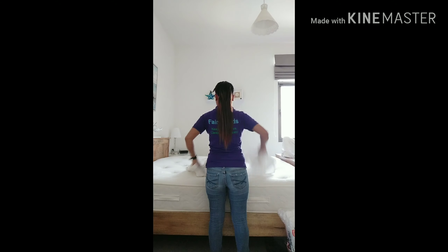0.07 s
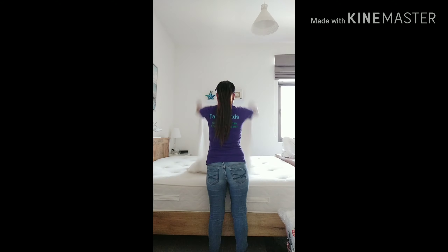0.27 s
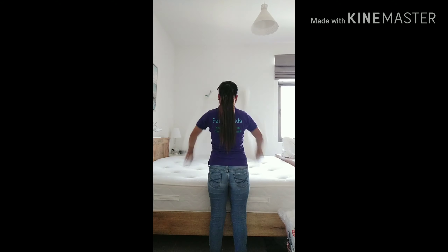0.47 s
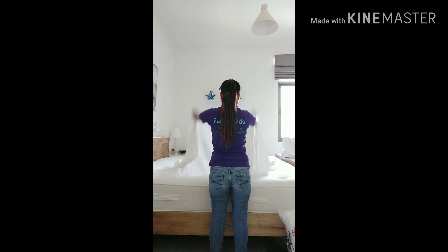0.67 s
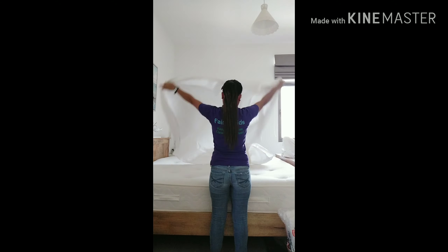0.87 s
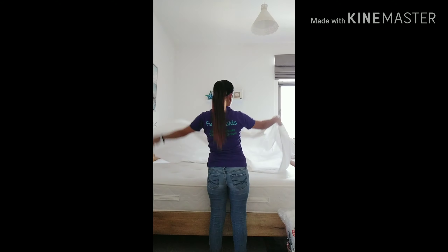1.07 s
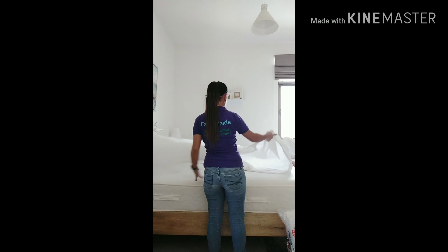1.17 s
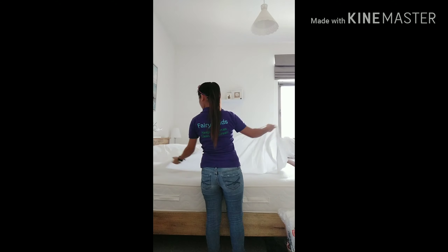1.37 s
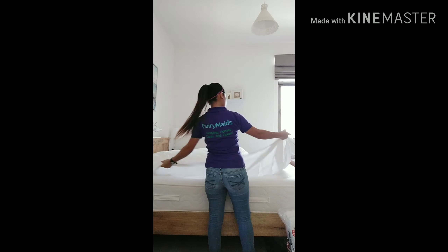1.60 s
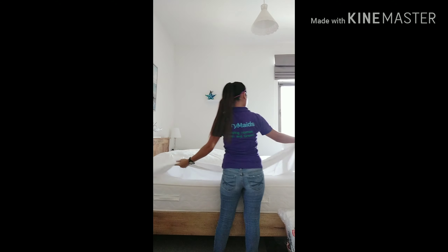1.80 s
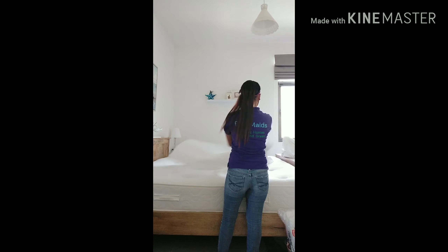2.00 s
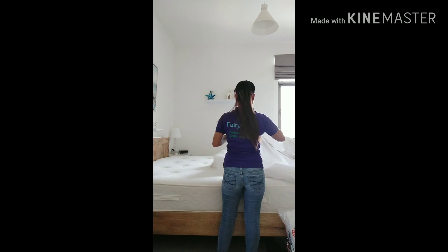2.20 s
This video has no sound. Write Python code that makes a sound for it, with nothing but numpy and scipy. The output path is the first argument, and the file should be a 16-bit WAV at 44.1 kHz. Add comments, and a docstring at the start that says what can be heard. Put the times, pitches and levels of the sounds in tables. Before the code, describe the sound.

A cotton sheet rustles lightly as it is gathered, swelling at about 0.2 seconds. It flaps near 0.4 seconds and again, more fully, around 0.6 to 0.7, with soft snaps, a swish and low puffs of air, settling by 0.9. The cloth then slides faintly over the bed with tiny scuffs, and rustles briefly again around 2.2 seconds. A faint room rumble lies underneath.

```python
"""Soft pops, a papery patter and a swish are heard first, over the faint rumble of a small bedroom:
a cotton sheet is gathered, shaken out twice and drawn over a bed. Ripples travel through the cloth
and pop at its edge, creases buckle, and friction between threads makes the weave hiss. Taut folds
snap, the billowing sheet pushes low puffs of air, and a faint hollow ring comes near the end.
Standing waves and reflections between the walls colour the sound of the cloth."""
import sys
import numpy as np
from scipy import signal
from scipy.fft import rfft, irfft
from scipy.io import wavfile
from scipy.ndimage import uniform_filter1d

SR = 44100
rng = np.random.default_rng(int(sys.argv[2]) if len(sys.argv) > 2 else 0)


def wav_record(signal):
    """Record a signal, one row per channel, as 16-bit PCM in the file named by sys.argv[1]."""
    frames = np.transpose(np.atleast_2d(signal))
    bounded = np.clip(frames, -1, 1)
    # unit amplitude maps onto the largest positive 16-bit level
    quanta = np.round(bounded * 32767).astype(np.int16)
    wavfile.write(sys.argv[1], SR, quanta)


N = 99225
T = np.arange(N) / SR
HZ = np.fft.rfftfreq(N, 1 / SR)

# Levels are relative within each table; a half-length is the standard deviation of a Gaussian swell.
# Cloth being shaken (time [s], flutter level [dB], crumple level [dB])
SHAKE_LEVELS = [(0, -66, -68.5), (.03, -64, -63), (.06, -79, -72.5), (.17, -75, -73), (.2, -62, -62.5),
                (.235, -50.5, -54.5), (.285, -53.5, -60), (.33, -86, -70.5), (.378, -47, -50.5),
                (.418, -44.5, -46), (.436, -37.5, -43.5), (.465, -42, -51.5), (.485, -69, -65.5),
                (.555, -65, -69.5), (.574, -40.5, -49.5), (.612, -36, -44), (.64, -32.5, -46),
                (.67, -48.5, -47.5), (.695, -39.5, -45.5), (.706, -54, -51), (.73, -44.5, -59),
                (.765, -51, -54), (.82, -50, -55), (.855, -48, -57), (.91, -78, -70), (1.0, -65, -71.5),
                (1.11, -63.5, -68), (1.24, -71, -83.5), (1.55, -68.5, -75.5), (1.66, -69.5, -80.5),
                (1.8, -67.5, -77), (1.93, -71, -80), (2.06, -74, -72.5), (2.14, -54.5, -61.5),
                (2.19, -58.5, -69), (2.215, -50.5, -73), (2.25, -73.5, -64.5)]
# Cloth sliding over cloth (time [s], level [dB])
SLIDE_LEVELS = [(0.0, -61.5), (0.03, -62), (0.06, -69.5), (0.18, -68), (0.23, -60), (0.27, -61),
                (0.32, -68), (0.34, -68), (0.37, -59), (0.44, -55), (0.51, -67.5), (0.55, -66), (0.6, -54),
                (0.7, -55.5), (0.74, -62.5), (0.75, -59.5), (0.85, -62.5), (0.96, -70), (1.15, -70.5),
                (1.25, -82), (1.48, -73.5), (1.55, -64.5), (1.6, -70.5), (1.63, -75.5), (1.87, -71.5),
                (1.92, -78), (2.06, -69), (2.15, -62), (2.25, -69.5)]
# Folds pulled taut (time [s], level [dB], time constant [ms])
TAUT_FOLDS = [(.191, -46, 1.1), (.290, -43, 1.1), (.378, -45, 0.34), (.432, -24, 0.65), (.441, -25.5, 0.54),
              (.571, -30.5, 0.33), (.607, -28.5, 0.36), (.631, -33, 0.51), (.646, -27, .6),
              (.679, -50, 0.27), (.690, -27.5, 0.73), (.757, -44, 0.16), (.797, -37.5, 1.5),
              (.818, -36.5, 0.18), (1.191, -42, 0.1), (1.271, -51, 0.16), (2.208, -49, .7)]
# Air pushed by the sheet (time [s], level [dB], half-length [s], pitch [Hz])
AIR_PUFFS = [(.445, -44, .017, 145), (.645, -38.5, .025, 122), (.74, -51, .025, 58), (.85, -53, .02, 125),
             (.22, -56, .025, 60)]
# Edge cutting the air (time [s], level [dB], half-length [s], centre [Hz], half-width [Hz])
EDGE_WHISH = (.39, -56, .018, 1850, 250)
# One fold rubbing across another (time [s], level [dB], half-length [s], tilt [dB/octave])
FOLD_SCUFFS = [(0.691, -45, 0.0055, 8.5), (0.815, -59, 0.0065, -2), (1.281, -65, 0.0085, 2),
               (1.335, -70, 0.0095, -12), (1.468, -67, 0.0062, 0), (1.598, -66, 0.0054, 6),
               (2.005, -65, 0.0094, 2), (2.155, -67, 0.0067, 8), (2.212, -60, 0.01, 1)]
# Faint ring (time [s], level [dB], half-length [s], centre [Hz], half-width [Hz])
HOLLOW_RING = (1.81, -64, .042, 392, 22)

# Spectra of the four noises (frequency [Hz], spectral density level [dB])
RUMBLE_SPECTRUM = [(10, -5), (28, -2.5), (50, 0.5), (90, 2), (130, -5), (200, -4.5), (280, -14.5),
                   (400, -14.5), (500, -25), (700, -21.5), (1200, -26.5), (3000, -38.5), (8000, -38.5),
                   (16000, -44.5)]
FLUTTER_SPECTRUM = [(30, -43), (80, -26), (130, 2), (190, 2), (260, 6.5), (350, -1.5), (490, -2),
                    (600, -25), (1000, -13), (3000, -37), (16000, -60)]
CRUMPLE_SPECTRUM = [(100, -67), (350, -4), (560, 2), (720, 1), (1000, -0.5), (1850, -3), (2400, -10),
                    (3500, -14.5), (6000, -26), (16000, -47)]
SWISH_SPECTRUM = [(200, -52), (900, -15.5), (2000, 4.5), (3400, 0.5), (4500, 2.5), (6000, -0.5), (8400, 4),
                  (10500, -1.5), (13000, -5.5), (15500, -7.5)]
# Likeness of left and right, for the cloth and for the room (frequency [Hz], coherence [0-1])
CLOTH_COHERENCE = [(60, 0.71), (130, 1), (290, 1), (640, 0.67), (1400, 0.26), (4000, 0.083), (15000, 0.083)]
ROOM_COHERENCE = [(25, 0.73), (120, 0.99), (300, 0.99), (700, 0), (1500, 0), (15000, 0)]
# Stereo balance of the cloth (frequency [Hz], left minus right [dB])
CLOTH_BALANCE = [(60, 3.5), (200, -2.5), (380, 4.5), (700, -2.1), (1300, 1.6), (2400, -0.4), (4400, -1),
                 (8100, .3), (14000, 1.5)]
# Reverberation of the bedroom (frequency [Hz], time to fall 60 dB [s])
ROOM_DECAY = [(100, 0.83), (500, 0.13), (2000, 0.37), (8000, 0.16), (16000, 0.076)]
# Standing waves between the walls (frequency [Hz], bandwidth [Hz], resonance gain [dB])
STANDING_WAVES = [(271, 28, -3), (350, 26, 0), (418, 22, -5), (492, 22, -6), (662, 22, -8), (712, 22, -5),
                  (868, 24, -5), (1285, 25, -3), (1581, 25, -6), (1872, 40, -7)]


def amp(db):
    """Amplitude grows tenfold for every 20 dB."""
    return 10 ** (np.asarray(db) / 20)


def unit(x):
    """Normalisation brings a signal to rms 1."""
    return x / np.sqrt(np.mean(x ** 2) + 1e-20)


def read(table, hz):
    """Interpolation on a log-frequency axis follows the way pitch is heard."""
    knots_hz, values = np.transpose(table)
    return np.interp(np.log(hz + 1), np.log(knots_hz + 1), values)


def envelope(table, column):
    """Straight lines in decibels give exponential rises and decays."""
    rows = np.array(table)
    return amp(np.interp(T, rows[:, 0], rows[:, column]))


def swell(time_s, db, half_s):
    """A Gaussian envelope rises and falls symmetrically about its peak."""
    return amp(db) * np.exp(-((T - time_s) / half_s) ** 2 / 2)


def coloured(pair, spectrum, coherence=CLOTH_COHERENCE):
    """The filtered sum and difference of two independent noises form a partly coherent stereo pair."""
    a, b = rfft(pair)
    alike = np.clip(read(coherence, HZ), 0, 1)
    mid, side = np.sqrt((1 + alike) / 2) * a, np.sqrt((1 - alike) / 2) * b
    return unit(irfft(np.array([mid + side, mid - side]) * amp(read(spectrum, HZ)), N))


def grains(per_s, spread_db, smooth):
    """Shot noise: independent pops of uneven size, over a share of smooth friction noise."""
    size = amp(spread_db * np.minimum(rng.exponential(1, (2, N)), 3))
    pops = size * rng.choice([-1, 1], (2, N)) * (rng.random((2, N)) < per_s / SR)
    return unit(pops) + smooth * rng.standard_normal((2, N))


def steadied(x, span_s):
    """Division by the running rms evens out chance swells, so the cloth's motion sets the level."""
    power = uniform_filter1d((x ** 2).mean(0), int(span_s * SR), mode="wrap")
    return x / np.sqrt(abs(power) + 1e-6)


def narrow_swell(time_s, db, half_s, hz, half_width_hz):
    """Noise confined to a band swells and fades; the narrower the band, the clearer its pitch."""
    noise = coloured(rng.standard_normal((2, N)), CRUMPLE_SPECTRUM)
    band = irfft(rfft(noise) * np.exp(-((HZ - hz) / half_width_hz) ** 2), N)
    return swell(time_s, db, half_s) * unit(band)


def rumble():
    """Stationary noise with its power at low frequencies fills the room, 1 dB stronger on the left."""
    noise = coloured(rng.standard_normal((2, N)), RUMBLE_SPECTRUM, ROOM_COHERENCE)
    return amp([[-57], [-58]]) * noise


def flutter():
    """Transverse waves reach the edge of the sheet and radiate dull, irregular pops."""
    ripples = coloured(grains(per_s=380, spread_db=2.5, smooth=.3), FLUTTER_SPECTRUM)
    return amp(-4.5) * envelope(SHAKE_LEVELS, column=1) * steadied(ripples, span_s=.019)


def crumple():
    """Buckling creases release elastic energy in a papery patter."""
    pops = coloured(grains(per_s=1100, spread_db=3.5, smooth=.33), CRUMPLE_SPECTRUM)
    return amp(2) * envelope(SHAKE_LEVELS, column=2) * steadied(pops, span_s=.023)


def swish(catch_hz=30, catch_db=1):
    """Stick-slip friction: threads catch and let go, so their fine-grained hiss flickers."""
    catch_spectrum = HZ / catch_hz * np.exp(-HZ / catch_hz)
    catch = unit(irfft(rfft(rng.standard_normal(N)) * catch_spectrum, N))
    threads = coloured(grains(per_s=5000, spread_db=2.5, smooth=1), SWISH_SPECTRUM)
    return amp(4 + catch_db * catch) * envelope(SLIDE_LEVELS, column=1) * threads


def snaps(cutoff_hz=2820):
    """Sudden tension accelerates a fold, radiating one pressure pulse and a weaker rebound."""
    out, t = np.zeros(N), np.arange(2048) / SR
    for time_s, db, decay_ms in TAUT_FOLDS:
        age = t / (decay_ms / 1e3)
        pulse = age * (2 - age) * np.exp(-age)
        span = out[round(time_s * SR):][:len(pulse)]
        span -= amp(db) * pulse[:len(span)] / pulse.max()
    return amp(-1) * signal.sosfilt(signal.butter(2, cutoff_hz, fs=SR, output="sos"), out)


def billows(pitch_wander=.025):
    """The filling sheet displaces air in a short, low oscillation of pressure."""
    out = np.zeros(N)
    for time_s, db, half_s, hz in AIR_PUFFS:
        drift = unit(uniform_filter1d(rng.standard_normal(N), size=600))
        cycles = np.cumsum(hz * (1 + pitch_wander * drift)) / SR + rng.random()
        out += swell(time_s, db, half_s) * np.sin(2 * np.pi * cycles)
    return out


def whish():
    """Airflow past the leading edge of the sheet makes a brief band of noise."""
    return narrow_swell(*EDGE_WHISH)


def scuffs():
    """Creases buckle in a brief cluster as folds rub; an upward tilt stands for a faster fold."""
    out = np.zeros((2, N))
    for time_s, db, half_s, tilt in FOLD_SCUFFS:
        spectrum = [(hz, level + tilt * np.log2(hz)) for hz, level in CRUMPLE_SPECTRUM]
        patter = coloured(grains(per_s=2600, spread_db=3, smooth=.81), spectrum)
        out += swell(time_s, db, half_s) * patter
    return amp(-2.5) * out


def hollow_ring():
    """A very narrow band of noise is heard as a faint, hollow pitch."""
    return narrow_swell(*HOLLOW_RING)


def bedroom(x, wet_db):
    """Standing waves resonate, and a tail of reflections decays exponentially."""
    resonance = sum(amp(db) / (1 + 2j * (HZ - hz) / width) for hz, width, db in STANDING_WAVES)
    x = irfft(rfft(x) * (1 + resonance), N)
    echoes = rng.standard_normal((2, SR // 2)) * (rng.random((2, SR // 2)) < .06)
    echoes[:, :150] = 0  # gap before the first reflection
    hz, t, bands = signal.stft(echoes, SR, nperseg=256)
    alike = np.clip(read(ROOM_COHERENCE, hz), 0, 1)[:, None]
    bands[1] = alike * bands[0] + np.sqrt(1 - alike ** 2) * bands[1]
    decay = amp(-60 * t / read(ROOM_DECAY, hz)[:, None])
    tail = signal.istft(bands * decay, SR, nperseg=256)[1]
    tail /= np.linalg.norm(tail[0])
    return x + amp(wet_db) * signal.fftconvolve(x, tail, axes=1)[:, :N]


def off_axis(x):
    """A source off axis reaches the two sides at unequal times and levels."""
    left_delay_s = .0004 * HZ / (HZ + 900)
    lag = np.exp(-2j * np.pi * HZ * left_delay_s)
    lean = amp(read(CLOTH_BALANCE, HZ) / 2)
    return irfft(rfft(x) * np.array([lean * lag, 1 / lean]), N)


def scene():
    """Superposition: the pressures from the cloth, the displaced air and the room add."""
    cloth = flutter() + crumple() + scuffs() + swish() + whish() + snaps()
    sheet = bedroom(cloth, wet_db=-15) + billows()
    return off_axis(sheet) + rumble() + hollow_ring()


def record(dry, cutoff_hz=15500):
    """A linear-phase low-pass filter removes the highest treble."""
    lowpass = signal.firwin(511, cutoff_hz, window=("kaiser", 9), fs=SR)
    return signal.oaconvolve(dry, lowpass[None], "same")


dry = scene()
out = record(dry)
wav_record(out)
```